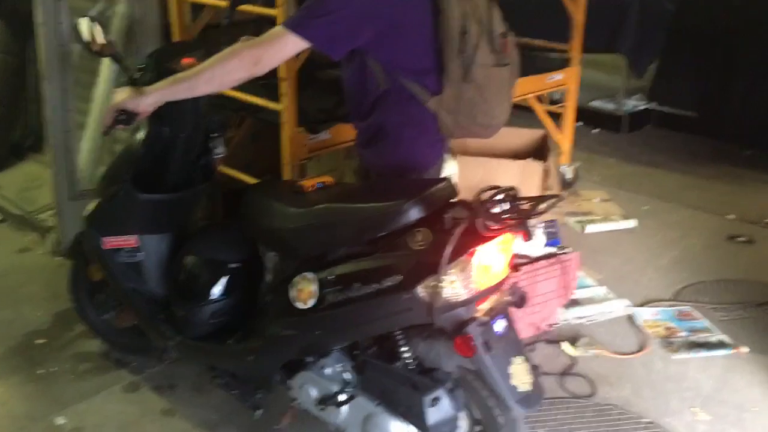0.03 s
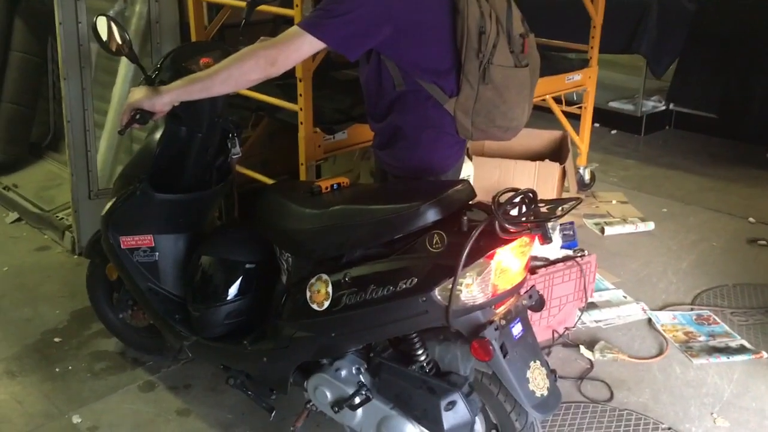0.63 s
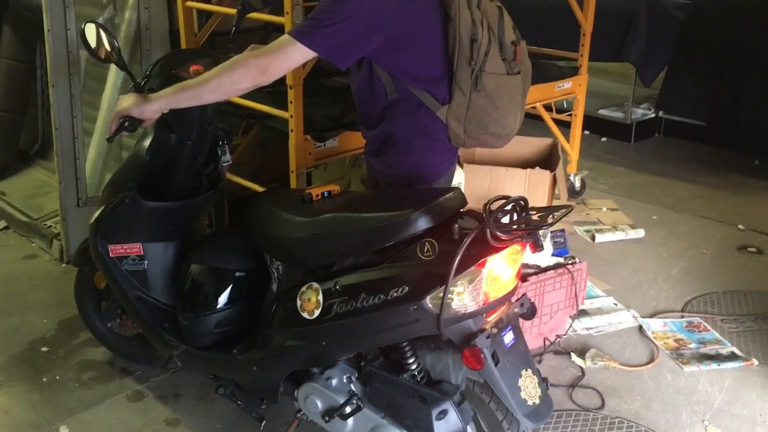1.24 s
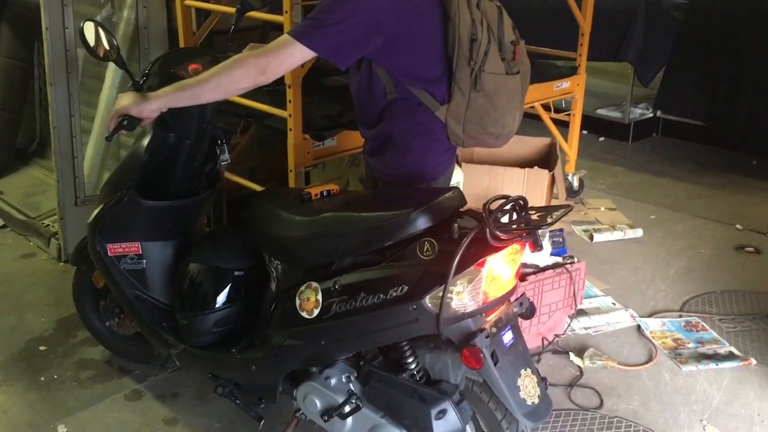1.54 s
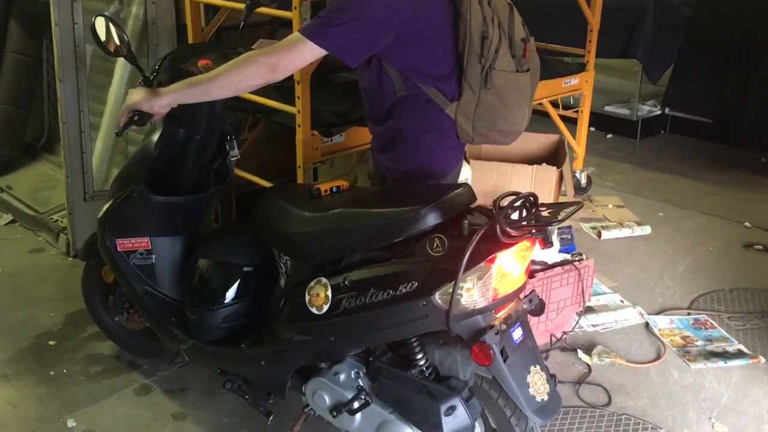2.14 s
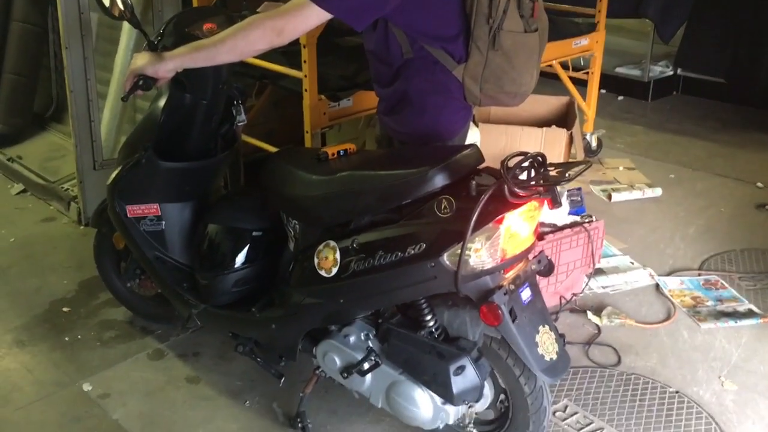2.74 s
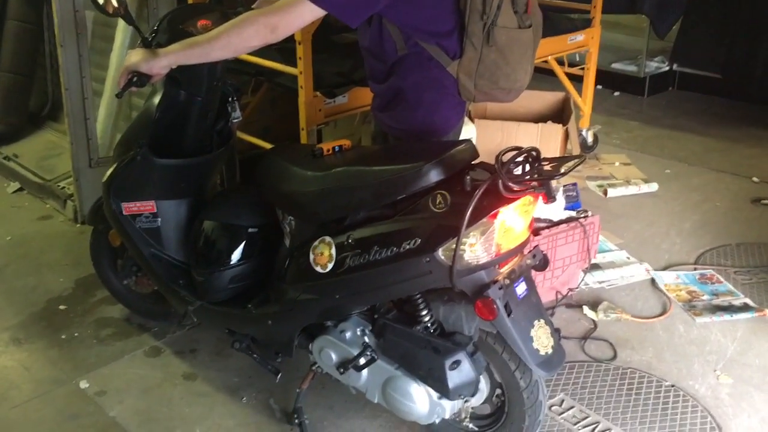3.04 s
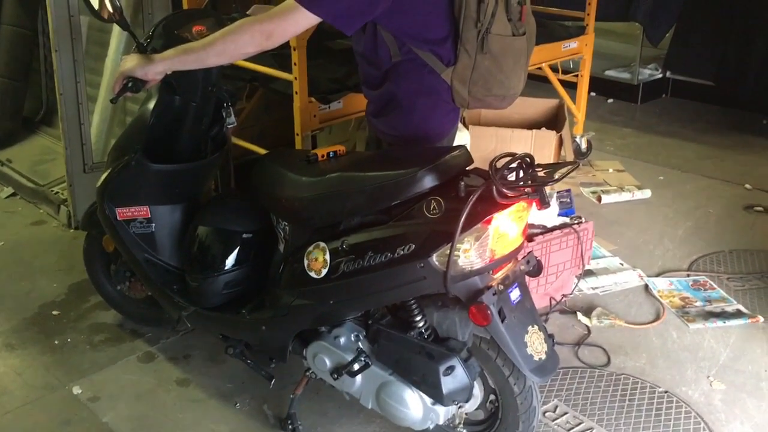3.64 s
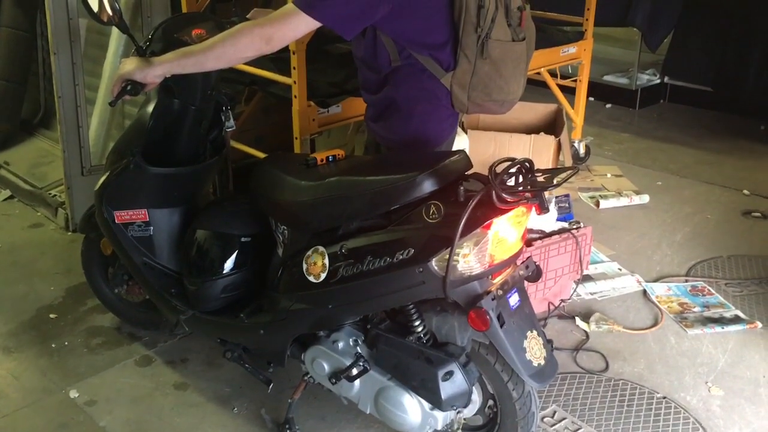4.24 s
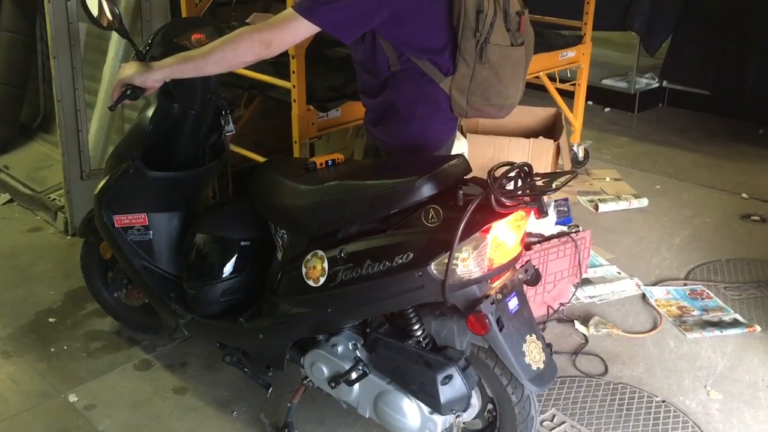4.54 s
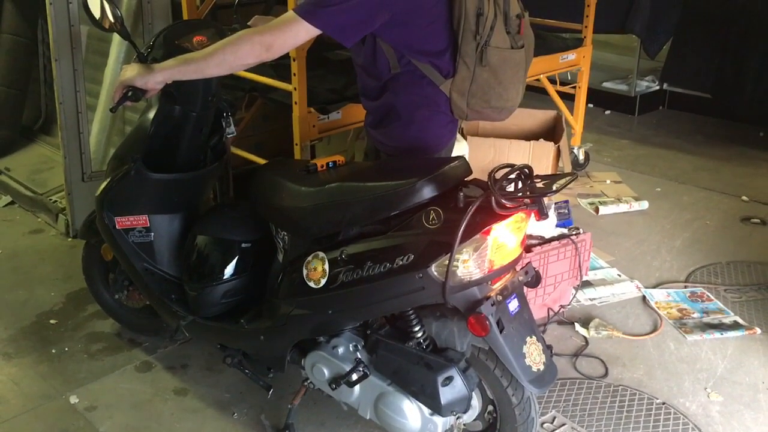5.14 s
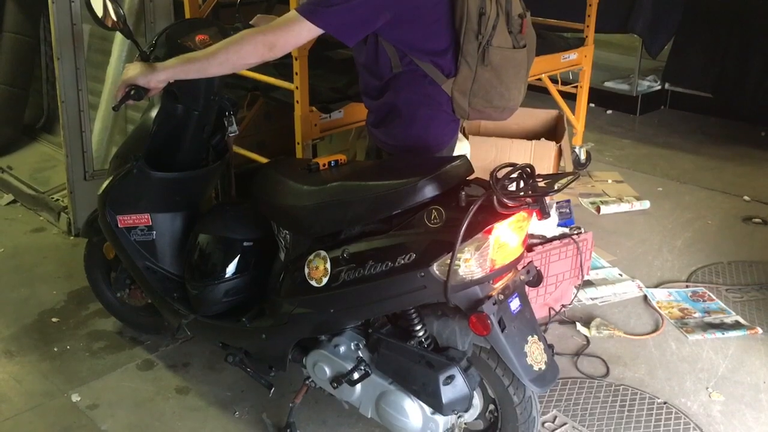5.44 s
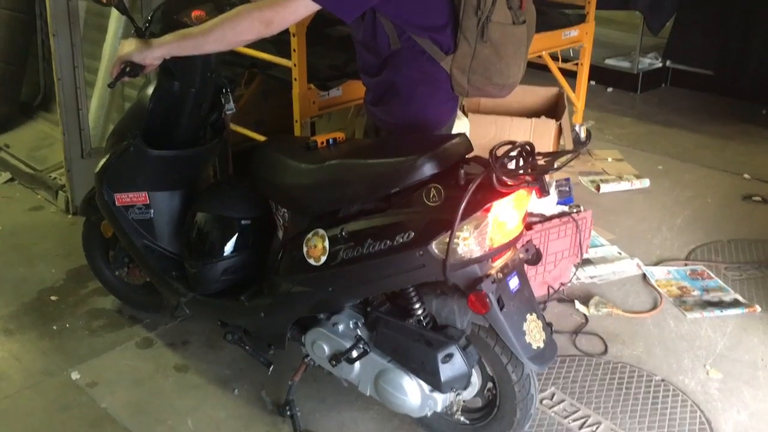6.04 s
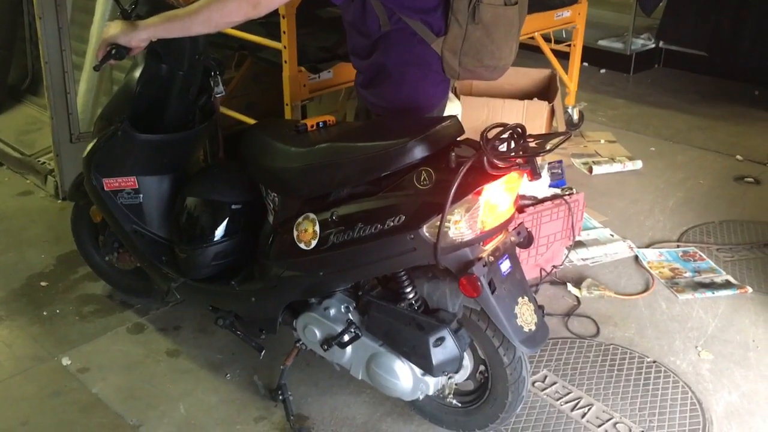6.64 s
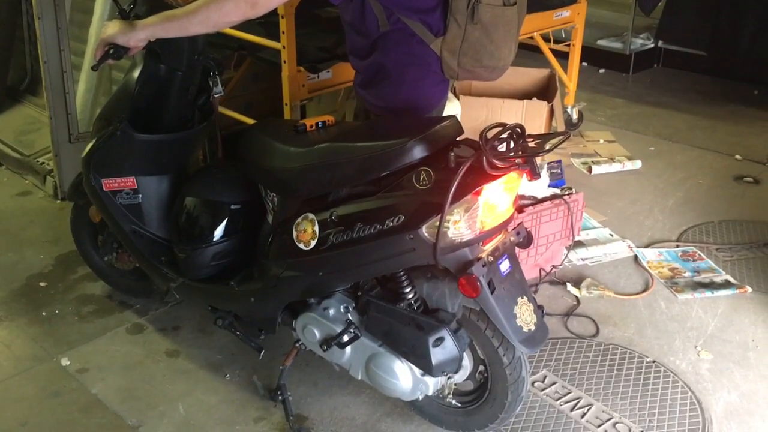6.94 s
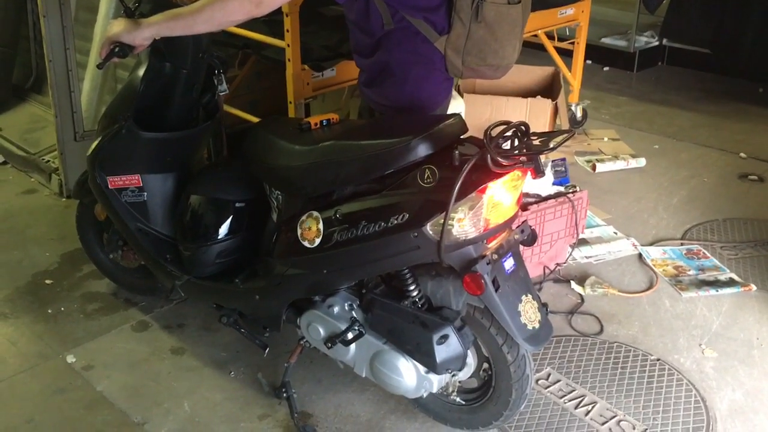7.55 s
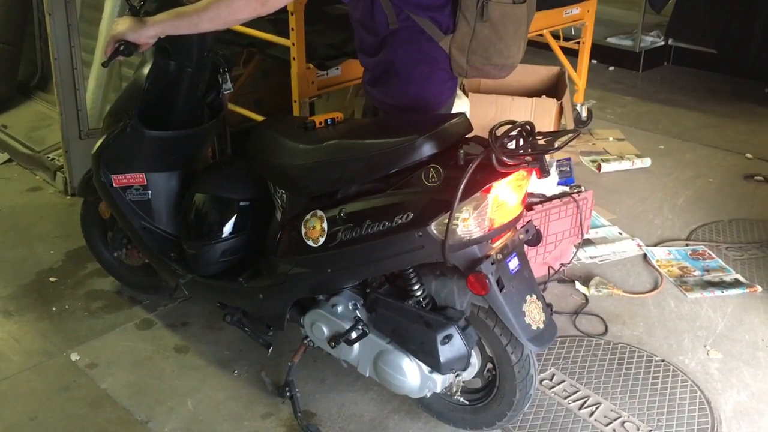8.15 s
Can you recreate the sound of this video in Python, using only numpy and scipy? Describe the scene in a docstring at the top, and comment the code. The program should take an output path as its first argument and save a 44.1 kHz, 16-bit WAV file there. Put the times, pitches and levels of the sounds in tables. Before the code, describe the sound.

A low rumble and hum fill a garage. At about 0.5 seconds a nearby scooter's electric starter engages with a metallic clash, scraping, tiny squeals and a few slow, uneven grinds. From about 1.1 seconds it cranks steadily: a continuous gear rattle with roughly eight clashes a second, some sharp and some softer, each ringing the metal casing and followed by a soft, low exhaust puff. The engine does not catch. At 5.8 seconds the starter is released and whirrs down, ending in a few faint ticks by 6.4 seconds, leaving only the room rumble. At 7 seconds the second try begins with a clunk, short squeals and more grinding. From 7.7 seconds it returns to the same rhythmic cranking, which continues to the end at about 8.4 seconds without the engine firing. The walls add a short echo to the gear noise.

```python
"""A garage, near a scooter whose electric starter cranks twice; the engine never catches.
The starter gears scrape, squeal and grind as they engage, then rattle on and clash once per crank
turn, ringing the alloy drive case. The exhaust puffs after each turn, and the gears whirr down
after the first try. The walls give a short echo, and the room rumbles underneath."""
import sys
import numpy as np
from scipy import signal
from scipy.fft import rfft, irfft, next_fast_len
from scipy.io import wavfile

SR = 44100
rng = np.random.default_rng(int(sys.argv[2]) if len(sys.argv) > 2 else 0)


def log_audio(samples):
    """Write samples as a 16-bit WAV file to the path given in sys.argv[1]."""
    # one column per channel
    frames = np.atleast_2d(samples).T
    # limit to full scale, then quantise
    limited = np.clip(frames, -1, 1)
    pcm = np.round(limited * 32767).astype(np.int16)
    wavfile.write(sys.argv[1], SR, pcm)


N = 369999

# The starter grinds through the slow first compression strokes.
# Each row: time in seconds, relative level in dB, length in seconds.
GRINDS = [(0.609, -22, 0.018), (0.961, -18.5, 0.022), (7.203, -17.5, 0.011), (7.411, -19, 0.025),
          (7.586, -17, 0.022)]
# Thin spectrum of tooth tips touching. Each row: frequency in Hz, relative level in dB.
TOOTH_TIP_COLOUR = [(300, -30), (1200, 0.5), (2400, -3.5), (4500, -2), (6500, 0.5), (9000, -0.5),
                    (10300, -4), (15500, -1)]


def from_db(db):
    """Decibels to gain."""
    return 10 ** (np.asarray(db) / 20)


def rms_one(x):
    """Scale to unit rms."""
    return x / np.sqrt(np.mean(x ** 2) + 1e-20)


def seconds():
    """Time of every sample."""
    return np.arange(N) / SR


def level(rows):
    """Gain along rows of seconds and dB, silent before the first."""
    s, db = np.transpose(rows)
    return from_db(np.interp(seconds(), s, db)) * (seconds() >= s[0])


def bump(at_s, width_s):
    """A bell shape in time, height 1."""
    return np.exp(-((seconds() - at_s) / width_s) ** 2 / 2)


def drift(per_s):
    """Smooth random wander, rms 1."""
    steps = rng.standard_normal(N // 20)
    return rms_one(np.interp(seconds() * per_s, np.arange(len(steps)), steps))


def colour(x, points):
    """Shape a steady signal's spectrum along rows of Hz and dB; rms 1."""
    hz, db = np.transpose(points)
    size = next_fast_len(N)
    bins = np.maximum(np.fft.rfftfreq(size, 1 / SR), 1)
    gain = from_db(np.interp(np.log(bins), np.log(hz), db))
    return rms_one(irfft(rfft(x, size) * gain, size)[:N])


def room_tone(hum_hz=65, air_db=-51.5):
    """A low rumble with a wavering hum in it, and the soft rush of air in the room."""
    # Rise and fall of rumble and hum. Each row: time in seconds, relative level in dB.
    rumble_levels = [(.08, -34.5), (.48, -33), (.7, -38.5), (4.8, -41), (6.0, -34.5), (7.0, -32.5),
                     (7.3, -37), (8.39, -34.5)]
    # Spectra of the rumble and the air. Each row: frequency in Hz, relative level in dB.
    rumble_colour = [(20, -51), (33, -26), (46, -5.5), (55, -5.5), (67, -9.5), (74, -4), (100, -13.5),
                     (118, -7.5), (135, -17.5), (200, -22), (300, -32.5), (500, -51), (1500, -85)]
    air_colour = [(100, -14), (300, -1.5), (600, -3.5), (1000, -1.5), (1450, -4.5), (2000, -9.5),
                  (3000, -17.5), (4500, -24.5), (6000, -27.5), (9000, -32), (15500, -31.5)]
    pitch = hum_hz * (1 + .055 * drift(10))
    hum = from_db(-1.5 + 1.5 * drift(20)) * np.sin(2 * np.pi * np.cumsum(pitch) / SR)
    rumble = from_db(-0.5) * colour(rng.standard_normal(N), rumble_colour)
    air = from_db(air_db + drift(34)) * colour(rng.standard_normal(N), air_colour)
    return (level(rumble_levels) * (hum + rumble) + air) * (seconds() > .086)


def starter_drive(attack_s=0.013, release_s=0.06, surge_db=6.5, sag_db=-4):
    """Gain of the rattle: on with the button, surging at spin-up, sagging as each grind loads the motor."""
    # The starter button is held. Each row: press in seconds, release in seconds.
    tries = [(0.497, 5.82), (7.036, 8.5)]
    t, held = seconds(), np.zeros(N)
    for on, off in tries:
        attack = 1 - np.exp(-np.maximum(t - on, 0) / attack_s)
        held += attack * np.exp(-np.maximum(t - off, 0) / release_s)
    surge = sum(bump(on + 0.1, width_s=0.035) for on, _ in tries)
    sag = sum(bump(s + 0.09, width_s=0.035) for s, _, _ in GRINDS)
    return held * from_db(-28.5 + surge_db * surge + sag_db * sag)


def teeth(per_s, spread_db, rub):
    """Tiny metal impacts of uneven size, each about a millisecond long, and the hiss of sliding flanks."""
    sizes = from_db(spread_db * np.minimum(rng.exponential(1, N), 3))
    impacts = sizes * (rng.random(N) < per_s / SR)
    power = signal.lfilter([1], [1, -np.exp(-2000 / SR)], impacts ** 2 + 1e-18)
    return np.sqrt(power / power.mean() + rub ** 2) * rng.standard_normal(N)


def gear_rattle(rotor_hz=82, throb_db=1.5, ticks_per_s=30, tick_s=0.002):
    """Loaded gears rattle, swelling at each rotor turn; now and then a tooth ticks across its play."""
    # Spectrum of the loaded gears. Each row: frequency in Hz, relative level in dB.
    rattle_colour = [(80, -18), (190, 2.5), (260, -2.5), (400, -4), (650, -13), (900, -6), (1200, 3),
                     (1800, -4), (2400, -3.5), (3300, -1.5), (4100, -5.5), (6500, -4.5), (7500, -5),
                     (10300, -9), (15500, -4)]
    rotor_phase = 2 * np.pi * np.cumsum(rotor_hz * (1 + .08 * drift(12))) / SR
    ticks = (rng.random(N) < ticks_per_s / SR) * rng.random(N) * from_db(7)
    play = signal.lfilter([1], [1, -np.exp(-1 / (tick_s * SR))], ticks + 1e-18)
    throb = from_db(-2 + throb_db * np.sin(rotor_phase) - 0.26 * drift(180))
    rattle = colour(teeth(per_s=2200, spread_db=5, rub=0.12), rattle_colour)
    return starter_drive() * throb * np.sqrt(1 + play ** 2) * rattle


def turn_clashes(firm_db=-11, firm_length_s=0.0044, db_per_doubling=9, brightness_db=0.3):
    """One clash per crank turn, in rows as for all_clashes: a firm bite is short, a soft one drags on."""
    # About eight turns a second, one list per try. Each row: time in seconds, crank turns done.
    cranking = [
        [(1.104, 0), (1.603, 4), (2.091, 8), (2.46, 11), (2.59, 12), (3.579, 20), (4.668, 29), (5.042, 32),
         (5.785, 38)],
        [(7.721, 0), (8.344, 5)],
    ]
    # The bite is nearly always firm on even turns, and comes and goes on odd ones.
    # Each row: time in seconds, relative level in dB.
    even_bite = [(1.85, -12.5), (2.34, -19), (2.55, -11.5), (8.3, -12)]
    odd_bite = [(1.9, -17), (2.21, -11.5), (2.46, -11), (2.71, -21), (2.96, -18.5), (3.21, -12.5),
                (3.45, -13.5), (3.7, -19), (4.0, -18), (4.43, -17), (4.92, -13), (5.41, -13), (5.66, -19),
                (7.7, -11.5), (7.97, -10.5), (8.22, -15)]
    rows = []
    for marks in cranking:
        times, turns = np.transpose(marks)
        for turn in range(int(turns[-1]) + 1):
            s = np.interp(turn, turns, times)
            bite = odd_bite if len(rows) % 2 else even_bite
            db = np.interp(s, *np.transpose(bite))
            length = firm_length_s * 2 ** ((firm_db - db) / db_per_doubling)
            rows.append((s, db, length, brightness_db))
    return rows


def all_clashes(grind_brightness_db=-2.5):
    """Catches and grinds of the run-up, then the steady turns, all in rows of the same form."""
    # Teeth catch out of step before the crank is up to speed.
    # Each row: time in seconds, relative level in dB, length in seconds, brightness in dB.
    catches = [(0.534, -13.5, 0.0031, -4), (0.77, -15, 0.0071, -0.5), (0.875, -20, 0.0062, -1.5),
               (0.89, -19, 0.0025, 0), (0.921, -25.5, 0.004, 12), (1.212, -31, 0.0029, 17),
               (7.075, -11, 0.004, -1.5), (7.273, -24.5, 0.0054, -2), (7.296, -22.5, 0.0058, 2),
               (7.322, -20.5, 0.004, -8), (7.346, -23, 0.014, 1), (7.539, -18.5, 0.0037, 3)]
    grinds = [(s, db, length, grind_brightness_db) for s, db, length in GRINDS]
    return list(catches) + grinds + turn_clashes()


def scrapes(gain_db=-23, lead_s=0.018, threshold_db=-18.5):
    """Just before each of the harder clashes the tooth tips skid over each other with a thin hiss."""
    force = np.zeros(N)
    for s, db, _, brightness in all_clashes():
        if db > threshold_db:
            near = slice(int((s - lead_s) * SR), int(s * SR))
            rise = np.linspace(.01, 1, len(force[near])) ** 0.11
            force[near] += from_db(gain_db + brightness / 2) * rise
    return force * colour(teeth(per_s=2300, spread_db=-0.5, rub=1), TOOTH_TIP_COLOUR)


def squeals(gain_db=-5, waver=0.0433, octave_db=-8):
    """Brief, rough, falling squeals, and one low groaning clunk as the gears engage again."""
    # Each row: peak time in seconds, half-width in seconds, pitch in Hz,
    # glide in octaves per second, relative level in dB.
    glides = [(.532, 0.003, 2255, -13.5, -12.5), (.533, 0.0021, 6500, -3.5, -3),
              (.536, 0.0032, 1480, -18.5, -13), (0.579, 0.0028, 2260, -5, -12.5),
              (0.6, 0.0086, 2160, -2.5, -14), (5.785, 0.0035, 2510, -14, -14.5),
              (7.082, .004, 1550, -30, -12.5), (7.083, 0.0095, 422.3, -60.5, -24),
              (7.11, 0.0031, 2250, -37.5, -14), (7.132, .004, 2195, -2.5, -18),
              (7.2, 0.0083, 2170, -20, -12.5), (7.419, 0.0051, 2300, -2, -20)]
    out, t = np.zeros(N), seconds()
    wander = 1 + waver * drift(600)
    grip = from_db(2.5 * drift(700))
    for s, width, hz, glide, db in glides:
        near = slice(int(s * SR) - SR // 30, int(s * SR) + SR // 30)
        dt = t[near] - s
        swell = from_db(db + gain_db) * np.exp(-(dt / width) ** 2 / 2)
        phase = 2 * np.pi * np.cumsum(hz * 2 ** (glide * dt) * wander[near]) / SR
        out[near] += swell * (np.sin(phase) + from_db(octave_db) * np.sin(2 * phase))
    return out * grip


def clash_force(dt, length, tail_db=-12, tail_s=0.025):
    """Teeth slam together and chatter out; dt is the time from the peak."""
    rise = (dt / (0.79 * length)) ** 2 / 2
    fall = np.abs(dt) / (1.32 * length)
    slam = np.exp(-np.where(dt < 0, rise, fall))
    chatter = from_db(tail_db) * np.exp(-np.abs(dt) / tail_s) * (dt >= 0)
    return np.sqrt(slam ** 2 + chatter ** 2)


def clashes(split_hz=4000, neutral_brightness_db=2):
    """Bursts of tooth impacts, each tilted towards bass or treble by its brightness."""
    low_power, high_power, t = np.zeros(N), np.zeros(N), seconds()
    for s, db, length, brightness in all_clashes():
        near = slice(int(s * SR) - SR // 10, int(s * SR) + SR // 10)
        force = from_db(db) * clash_force(t[near] - s, length)
        tilt = from_db((brightness - neutral_brightness_db) / 2)
        low_power[near] += (force / tilt) ** 2
        high_power[near] += (force * tilt) ** 2
    # Spectrum of clashing teeth. Each row: frequency in Hz, relative level in dB.
    clash_colour = [(100, -24), (300, -13.5), (800, -19), (1100, -7), (2000, -8), (2550, -2.5),
                    (3400, -4.5), (4200, -6), (5000, -3), (6400, 0), (7400, -6.5), (9300, -5.5),
                    (10300, -8.5), (15500, -8.5)]
    impacts = colour(teeth(per_s=2500, spread_db=2, rub=0.77), clash_colour)
    low = signal.sosfiltfilt(signal.butter(2, split_hz, fs=SR, output="sos"), impacts)
    return low * np.sqrt(low_power) + (impacts - low) * np.sqrt(high_power)


def knocks(gain_db=15, floor_echo_s=0.00738, shudder_s=0.029, band_hz=(270, 702)):
    """Each clash gives a low knock, a quick echo off the floor and a short shudder."""
    jolts, dt = np.zeros(N), np.arange(SR // 5) / SR
    for s, db, _, _ in all_clashes():
        start = int((s - .001) * SR)
        shake = from_db(-36) * rng.standard_normal(len(dt)) * np.exp(-dt / shudder_s)
        shake[[0, int(floor_echo_s * SR)]] += [1, from_db(-3)]  # knock and floor echo
        jolts[start:start + len(dt)] += from_db(db + gain_db) * shake[:N - start]
    return -signal.sosfilt(signal.butter(2, band_hz, "band", fs=SR, output="sos"), jolts + 1e-18)


def exhaust(pipe_hz=112, overtone_hz=195, delay_s=0.052, swell_s=0.0162, puff_db=-30.5, spread_db=2):
    """Unburnt charge puffs out unevenly after every grind and turn; the silencer booms for a few cycles."""
    out, dt = np.zeros(N + SR), np.arange(SR // 5) / SR
    swell = (dt / swell_s) ** 2 * np.exp(2 - 2 * dt / swell_s)
    peaks_s = [row[0] + delay_s for row in list(GRINDS) + turn_clashes()]
    levels_db = rng.normal(puff_db, spread_db, len(peaks_s))
    detunes = rng.normal(1, .04, (len(peaks_s), 2))
    for s, db, detune in zip(peaks_s, levels_db, detunes):
        boom = np.sin(2 * np.pi * pipe_hz * detune[0] * dt)
        overtone = from_db(-12) * np.sin(2 * np.pi * overtone_hz * detune[1] * dt)
        start = int((s - swell_s) * SR)
        out[start:start + len(dt)] += from_db(db) * swell * (boom + overtone)
    return out[:N]


def coast(gain_db=-3):
    """Unloaded, the gears whirr more smoothly and darkly until they stop."""
    # The starter spins down. Each row: time in seconds, relative level in dB.
    spin_down = [(5.76, -64), (5.82, -34.5), (6.12, -36), (6.19, -43), (6.24, -50.5), (6.36, -49.5),
                 (6.42, -85)]
    # Spectrum of the free gears. Each row: frequency in Hz, relative level in dB.
    whirr_colour = [(100, -18), (250, -6.5), (550, -15.5), (1000, 1.5), (1300, 5.5), (1800, -1),
                    (2400, -1.5), (3000, -6.5), (4500, -1.5), (6900, -6.5), (7500, -11), (9600, -10),
                    (10300, -14.5), (15500, -15)]
    envelope = level(spin_down) * from_db(gain_db + drift(150))
    return envelope * colour(teeth(per_s=2300, spread_db=7, rub=.9), whirr_colour)


def last_ticks(decay_s=.004):
    """The slowing gears drop tooth by tooth into their play."""
    # Each row is one tick: start in seconds, level in dB.
    ticks = [(5.918, -37.5), (6.278, -52), (6.321, -48), (6.348, -46), (6.371, -50.5)]
    t = seconds()
    force = sum(from_db(db) * np.exp(-np.abs(t - s) / decay_s) * (t > s) for s, db in ticks)
    return force * colour(rng.standard_normal(N), TOOTH_TIP_COLOUR)


def drive_case(x, coupling):
    """The alloy case rings at each of its resonances, as far as the source is coupled to it."""
    # Each row is one resonance: frequency in Hz, width in Hz, lift in dB at full coupling.
    resonances = [(252, 10, 4.6), (332, 34, 8.8), (392, 35, 6.5), (514, 23, 11.0), (652, 63, 8.4),
                  (1142, 30, 3.3), (1318, 33, 5.9), (1438, 56, 8.7), (1605, 28, 5.4), (1869, 92, 4.2),
                  (2135, 48, 8.9), (2359, 201, 8.4), (2630, 100, 5.5), (2920, 57, 4.5), (3169, 57, 4.3),
                  (3422, 176, 5.6), (4096, 103, 4.2), (4621, 96, 6.0), (5435, 80, 6.3), (5989, 88, 6.2),
                  (6584, 144, 5.6), (7955, 102, 4.2), (9003, 352, 7.0), (9582, 288, 4.2), (11011, 171, 7.0),
                  (12330, 178, 4.2), (12892, 139, 4.2), (13864, 111, 6.0)]
    for hz, width_hz, lift_db in resonances:
        radius = np.exp(-np.pi * width_hz / SR)
        feedforward = np.array([1, 0, -1]) * (1 - radius ** 2) / 2  # gain 1 at the peak
        feedback = [1, -2 * radius * np.cos(2 * np.pi * hz / SR), radius ** 2]
        ring = signal.lfilter(feedforward, feedback, x + 1e-18)
        x = x + (from_db(coupling * lift_db) - 1) * ring
    return x


def garage(x, near_db, hall_db, near_t60_s=0.039, hall_t60_s=0.56, wall_hz=7000):
    """The direct sound, quick scatter from the floor and bodywork, then a duller tail from the walls."""
    dt = np.arange(SR) / SR
    scatter, tail = rng.standard_normal((2, SR))
    scatter *= from_db(-60 * dt / near_t60_s) * (dt > .002)
    tail = signal.lfilter(*signal.butter(1, wall_hz, fs=SR), tail)
    tail *= from_db(-60 * dt / hall_t60_s) * (dt > .012)
    echoes = from_db(near_db) * scatter / np.linalg.norm(scatter)
    echoes += from_db(hall_db) * tail / np.linalg.norm(tail)
    return x + signal.fftconvolve(x, echoes)[:N]


def scene():
    """Gear sounds reach one microphone through the case and the garage; the exhaust arrives direct."""
    blows = garage(drive_case(clashes() + scrapes(), coupling=0.91), near_db=-10, hall_db=-11.5)
    gears = gear_rattle() + coast() + last_ticks()
    running = garage(drive_case(gears, coupling=0.79), near_db=-8.5, hall_db=-10.5)
    tones = garage(drive_case(knocks() + squeals(), coupling=0.88), near_db=-17, hall_db=-18)
    return (blows + running + tones + exhaust() + room_tone())[None]


def record(dry, cutoff_hz=15850):
    """The highest peaks are rounded and the top of the treble is cut."""
    return signal.sosfilt(signal.ellip(12, .2, 80, cutoff_hz, fs=SR, output="sos"), np.tanh(dry))


dry = scene()
out = record(dry)
log_audio(out)
```